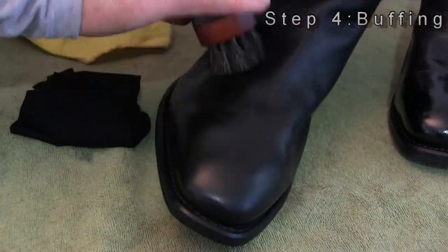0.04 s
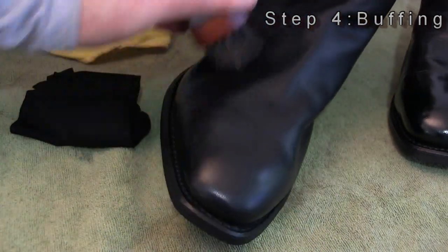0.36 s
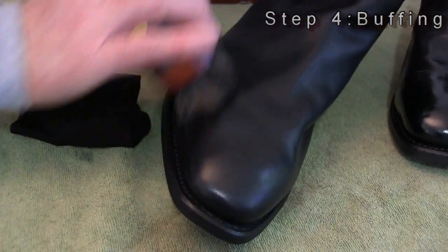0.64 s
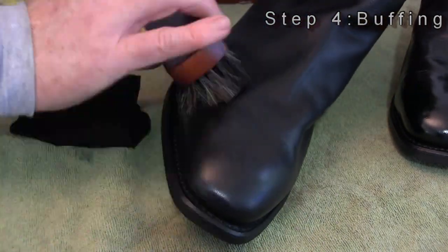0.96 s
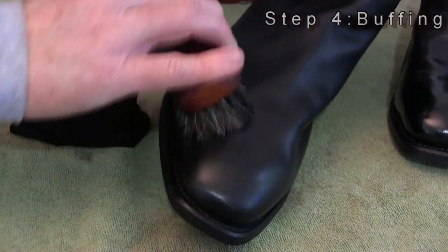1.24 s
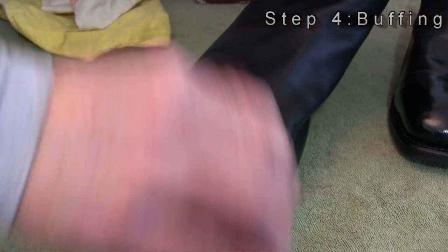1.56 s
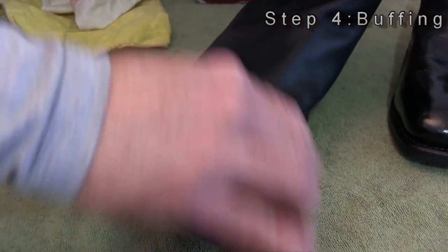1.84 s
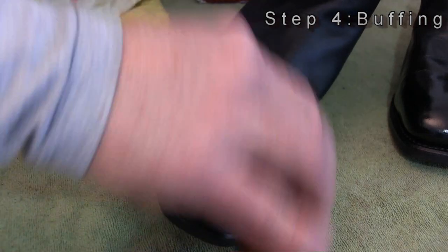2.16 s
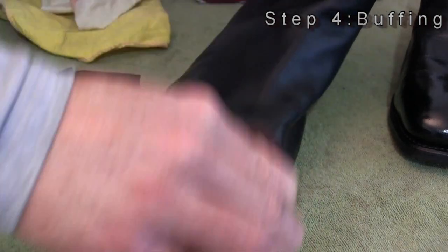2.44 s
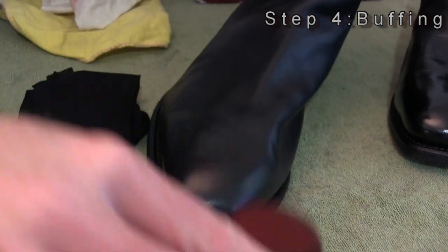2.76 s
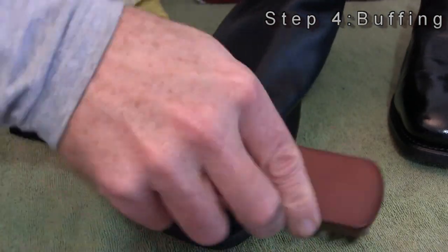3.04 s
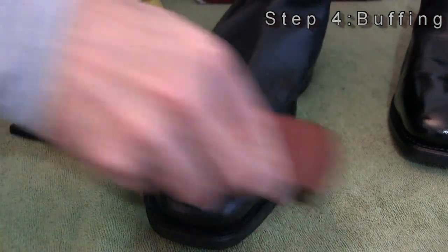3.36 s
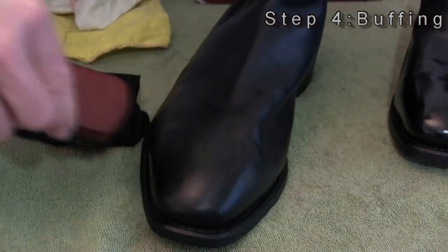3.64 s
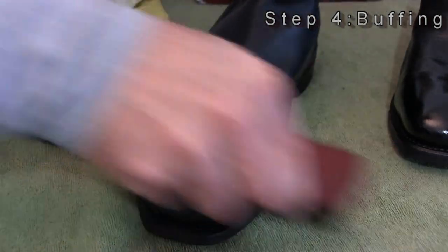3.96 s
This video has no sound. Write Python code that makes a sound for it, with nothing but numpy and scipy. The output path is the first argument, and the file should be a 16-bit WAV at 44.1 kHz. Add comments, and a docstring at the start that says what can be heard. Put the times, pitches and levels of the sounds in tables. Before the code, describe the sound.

A bristle brush swishes rapidly back and forth over a leather boot, with soft, hollow bumps. After a brief pause, the wooden handle knocks once and a few slower, lighter strokes follow, heard close in a small room.

```python
"""Quick back-and-forth strokes of a bristle brush hiss over a leather boot on a towel in a small room.
Friction is a dense train of tiny bristle impacts: speed sets the rasp and hiss, pressure the drag on
the leather. The strokes set off a low, hollow ringing, and now and then the brush bumps the boot.
After a pause, a faint squeak and one knock of the wooden handle come four slower, lighter strokes."""
import sys
import numpy as np
from scipy import signal
from scipy.fft import rfft, irfft
from scipy.io import wavfile

SR = 44100
rng = np.random.default_rng(int(sys.argv[2]) if len(sys.argv) > 2 else 0)


def pcm_store(signal):
    """Save signal as 16-bit PCM."""
    levels = np.round(np.clip(np.atleast_2d(signal), -1, 1) * 32767)
    wavfile.write(sys.argv[1], SR, levels.astype(np.int16).T)


N = 176400

# Background noise spectrum: frequency_hz, level_db
ROOM_SPECTRUM = [(30, 6), (135, 1.5), (220, -1.5), (550, 4), (1000, -5.5), (2500, -7), (16000, -21)]
# Reverberation time: frequency_hz, t60_s
ROOM_DECAY = [(100, 0.71), (500, 0.3), (15000, 0.34)]
# Stereo width: frequency_hz, side_to_mid_db
STEREO_WIDTH = [(60, -12), (130, -18), (450, -11), (1100, -18), (5500, -22), (8500, -13.5)]
# Stereo balance: frequency_hz, left_over_right_db
STEREO_BALANCE = [(250, 2.1), (500, -0.5), (4000, 0.1), (8000, 1.3)]

# Glide of the squeak: time_s, pitch_hz
SQUEAK_GLIDE = [(3.03, 2650), (3.125, 2280)]
# Knock of the handle: start_s, level_db
HANDLE_KNOCKS = [(3.12, -37)]
# Modes of the wooden handle: pitch_hz, level_db, t60_s
HANDLE_MODES = [(310, 5.5, 0.017), (407, -2, 0.064), (562, -10, 0.19), (2040, 0, 0.0086), (3000, 2, 0.016),
                (3650, 2, 0.019), (4480, -3, 0.013)]
# The leather gives and flops back: start_s, level_db, first_pitch_hz
LEATHER_THUMPS = [(0.663, -34.5, 279), (.968, -34.5, 381), (1.252, -34, 353), (2.781, -40.5, 260),
                  (3.131, -39, 133)]
# The brush bumps taut leather: start_s, level_db, pitch_hz
LEATHER_BUMPS = [(.969, -32, 310), (1.176, -34, 310), (1.253, -33, 300), (1.4545, -24, 620),
                 (2.106, -31, 380), (2.129, -29, 350), (2.295, -33, 540), (2.521, -26, 390),
                 (2.576, -31, 290), (2.813, -33, 250)]
# The brush meets the toe cap: start_s, level_db, length_s, pitch_hz
TOE_SLAPS = [(0.236, -40.5, 0.031, 302), (0.558, -37, 0.016, 480), (0.867, -40.5, 0.049, 360),
             (1.166, -39.5, 0.04, 420), (1.346, -43.5, 0.022, 720), (1.606, -43, 0.018, 606),
             (1.938, -36.5, 0.0065, 386), (2.388, -42, 0.053, 427), (2.517, -36.5, 0.021, 385),
             (2.767, -40, 0.026, 410), (3.485, -49.5, 0.065, 476)]
# Bristles whip off the edge of the boot: peak_s, level_db
EDGE_WHIPS = [(.295, -42), (2.455, -42), (3.361, -44.5), (3.778, -40)]

# Narrow, low ringing set off by the strokes, probably in the room: pitch_hz, bandwidth_hz, level_db
LOW_RESONANCES = [(138.2, 7.4, 0.5), (183.2, 9.6, -3), (287.6, 16.5, -5), (422.5, 24, -3),
                  (568.7, 19, -6.5), (770, 17, -25)]
# Spectra of low boom, leather drag, bristle hiss and bristle rasp: frequency_hz, level_db
BOOM_SPECTRUM = [(60, -38), (79, -5), (97, -33), (120, 1), (140, 2), (160, -9.5), (200, -1.5), (300, -7),
                 (600, -26), (3000, -83)]
DRAG_SPECTRUM = [(50, -32), (200, 6), (400, 5), (600, 6.5), (750, 3), (1100, 5), (1500, 3.5), (2100, 1),
                 (3500, 4.5), (8000, -47)]
HISS_SPECTRUM = [(1500, -36), (4000, -4.5), (7000, -1), (8700, -6), (9800, -1.5), (11200, 4.5),
                 (12500, -0.5), (13700, 3.5), (14900, -4)]
RASP_SPECTRUM = [(500, -17), (1500, -43), (2200, -2), (2900, -5.5), (3250, 1.5), (3560, 5), (4200, -1),
                 (5200, 1), (6500, -4.5), (8500, -10.5), (16000, -28)]
# Brightest band of the rasp as the brush moves over the boot: time_s, centre_hz
RASP_FOCUS = [(.6, 3950), (.78, 5400), (1.5, 5030), (2.0, 3840), (2.6, 4750)]
# Brush strokes, with crests as shares of the length and levels before each layer's gain:
# start_s, length_s, speed_crest, pressure_crest, rasp_db, hiss_db, drag_db, boom_db
BRUSH_STROKES = [ (-.045, 0.14, 0.24, 0.2, -38.5, -41.5, -41, -50),
                 (0.078, 0.14, 0.43, 0.5, -37.5, -41, -40, -50.5),
                 (0.216, 0.15, 0.45, 0.32, -35, -40, -39.5, -53.5),
                 (0.368, 0.16, 0.41, 0.43, -37.5, -41, -40, -48.5),
                 (0.52, 0.17, 0.49, 0.2, -35, -39, -39, -53.5),
                 (0.688, 0.16, 0.53, 0.75, -37.5, -39.5, -44.5, -59.5),
                 (0.843, 0.17, 0.44, 0.33, -38.5, -41.5, -45.5, -58.5),
                 (1.011, 0.13, 0.53, 0.81, -38.5, -37.5, -43, -62.5),
                 (1.135, 0.16, 0.41, 0.25, -37.5, -40.5, -44, -53),
                 (1.295, 0.13, 0.55, 0.62, -37, -39.5, -44.5, -53.5),
                 (1.419, 0.13, 0.39, 0.19, -40, -42, -42.5, -52),
                 (1.55, 0.13, 0.58, 0.63, -40, -40, -46.5, -55),
                 (1.671, 0.12, 0.23, 0.17, -40, -41, -42.5, -52),
                 (1.774, 0.11, 0.63, 0.4, -42, -40.5, -50.5, -55.5),
                 (1.854, 0.13, 0.6, 0.57, -45, -46.5, -48, -49.5),
                 (1.975, 0.11, 0.48, 0.36, -40, -42, -42, -52),
                 (2.081, 0.058, 0.38, .5, -44, -46.5, -48, -45),
                 (2.126, 0.043, 0.34, 0.26, -43.5, -45.5, -45, -48.5),
                 (2.166, 0.13, 0.4, 0.2, -40.5, -41.5, -41, -48.5),
                 (2.289, 0.1, 0.21, 0.21, -40, -42, -44.5, -49),
                 (2.374, 0.12, 0.44, 0.18, -36.5, -40.5, -35.5, -44.5),
                 (2.496, 0.13, 0.31, 0.21, -38, -39.5, -41.5, -47),
                 (2.624, 0.13, 0.49, 0.44, -40, -40.5, -44, -52),
                 (2.747, 0.13, 0.27, .26, -38.5, -39.5, -43.5, -47.5),
                 (3.115, 0.12, 0.11, 0.02, -51.5, -56, -48.5, -53.5),
                 (3.218, 0.18, 0.55, 0.44, -48, -46.5, -51.5, -62),
                 (3.449, 0.19, 0.52, 0.6, -49, -47.5, -52, -63),
                 (3.632, 0.16, 0.64, 0.52, -46.5, -43, -48.5, -62),
                 (3.894, 0.25, 0.17, 0.33, -50.5, -47, -51, -62.5)]


def amp(db):
    """Amplitude ratio of a level in decibels."""
    return 10 ** (np.asarray(db) / 20)


def unit(x):
    """Normalisation to an rms of one."""
    return x / np.sqrt(np.mean(x ** 2) + 1e-20)


def read(points, hz):
    """Interpolation along a log-frequency axis."""
    f, value = np.transpose(points)
    return np.interp(np.log(hz + 1), np.log(f + 1), value)


def colour(x, spectrum):
    """Filtering by multiplication in the frequency domain."""
    return irfft(rfft(x) * amp(read(spectrum, np.fft.rfftfreq(N, 1 / SR))), N)


def butterworth(x, order, hz, kind="low"):
    """Filtering with a maximally flat passband."""
    return signal.lfilter(*signal.butter(order, hz, kind, fs=SR), x)


def add(mix, start_s, sound):
    """Superposition of a sound on the mix."""
    part = mix[max(round(start_s * SR), 0):][:len(sound)]
    part += sound[:len(part)]


def resonate(x, hz, width_hz):
    """Forced response of one damped resonator."""
    return signal.lfilter(*signal.iirpeak(hz, hz / width_hz, SR), x)


def sweep(x, glide, width_hz):
    """A moving resonance by heterodyning: shift down, low-pass, shift back."""
    centre_hz = np.interp(np.arange(N) / SR, *np.transpose(glide))
    carrier = np.exp(2j * np.pi * np.cumsum(centre_hz) / SR)
    return (carrier * butterworth(x / carrier, 2, width_hz / 2)).real


def arch(start_s, length_s, crest, power, pointedness=0.71):
    """Amplitude envelope of one stroke, peaking at the share crest of its length."""
    u, crest = (np.arange(N) / SR - start_s) / length_s, np.clip(crest, .05, .95)
    out, on = np.zeros(N), (u > 0) & (u < 1)
    u = u[on]
    travel = u * (1 - crest) / (u * (1 - crest) + crest * (1 - u))
    rounded, pointed = np.sin(np.pi * travel), 1 - abs(2 * travel - 1)
    out[on] = ((1 - pointedness) * rounded + pointedness * pointed) ** power
    return out


def flicks(per_s=36000, spread_db=2.0):
    """Shot noise: dense, tiny clicks of bristle tips, uneven in size."""
    size = amp(spread_db * np.minimum(rng.exponential(1, N), 4))
    return unit(rng.standard_normal(N) * size * (rng.random(N) < per_s / SR))


def friction(spectrum):
    """Source and filter: bristle clicks shaped by a spectrum."""
    return unit(colour(flicks(), spectrum))


def unsteady(rate_hz, depth_db):
    """Random amplitude modulation: a gain that follows low-passed noise."""
    hz = np.fft.rfftfreq(N, 1 / SR)
    wander = irfft(rfft(rng.standard_normal(N)) / (1 + (hz / rate_hz) ** 4), N)
    return amp(depth_db * unit(wander))


def room_tone(mid_db=-57.5, side_db=-6):
    """A diffuse field: faint room noise, partly correlated between left and right."""
    mid, side = (amp(mid_db) * unit(colour(rng.standard_normal(N), ROOM_SPECTRUM)) for _ in range(2))
    return np.array([mid + amp(side_db) * side, mid - amp(side_db) * side])


def reverberation(x):
    """Absorption in a furnished room gives a short exponential tail, longest in the bass."""
    hz, t, noise = signal.stft(rng.standard_normal(SR // 2), SR, nperseg=256)
    decay = amp(-60 * t / read(ROOM_DECAY, hz)[:, None])
    tail = signal.istft(noise * decay, SR, nperseg=256)[1]
    tail[:SR // 200] = 0  # the first reflection takes 5 ms
    return signal.fftconvolve(x, tail / np.linalg.norm(tail))[:N]


def spread(x, scatter_s=0.043):
    """Decorrelation: near reflections arrive left and right with different phases."""
    scatter = rfft(rng.standard_normal(N) * np.exp(-np.arange(N) / SR / scatter_s))
    side = colour(irfft(rfft(x) * scatter / abs(scatter), N), STEREO_WIDTH)
    return np.array([colour(x + sign * side, [(hz, sign * db / 2) for hz, db in STEREO_BALANCE])
                     for sign in (1, -1)])


def squeak(level_db=-61):
    """Narrow-band friction noise is heard as a faint, falling pitch."""
    (start, _), (end, _) = SQUEAK_GLIDE
    envelope = arch(start, end - start, crest=0.87, power=.5)
    return amp(level_db) * envelope * unit(sweep(flicks(), SQUEAK_GLIDE, width_hz=260))


def handle_knocks(crack_db=-1.5, crack_hz=9000, crack_s=.0035, attack_s=0.00026):
    """Impact excitation: a dry crack, then the free decay of the wood's modes."""
    out, t = np.zeros(N), np.arange(SR // 5) / SR
    ring = sum(amp(db - 60 * t / t60) * np.sin(2 * np.pi * hz * t) for hz, db, t60 in HANDLE_MODES)
    for start, db in HANDLE_KNOCKS:
        crack = butterworth(rng.standard_normal(len(t)), 1, crack_hz) * np.exp(-(t / crack_s) ** 2)
        add(out, start, amp(db) * (ring + amp(crack_db) * crack) * (1 - np.exp(-t / attack_s)))
    return out


def leather_thumps(length_s=0.031, attack_s=0.006, sag_s=0.0154, end_hz=113, overtone_db=-10):
    """Elastic recoil: the pitch sags as the leather gives, and a low pulse follows as it springs back."""
    rebound_s, rebound_hz, rebound_db = 0.01985, 136.7, -4.5
    out, t = np.zeros(N), np.arange(0, length_s, 1 / SR)
    u = t / length_s
    rebound = np.sin(np.pi * u) * np.sin(2 * np.pi * rebound_hz * t)
    for start, db, hz in LEATHER_THUMPS:
        phase = 2 * np.pi * np.cumsum(end_hz + (hz - end_hz) * np.exp(-t / sag_s)) / SR
        dent = np.sin(phase) + amp(overtone_db) * np.sin(1.794 * phase + 2 * np.pi * rng.random())
        add(out, start, amp(db) * dent * (1 - np.exp(-t / attack_s)) * (1 - u ** 2))
        add(out, start + rebound_s, amp(db + rebound_db) * rebound)
    return out


def leather_bumps(rise_cycles=0.77, crunch_db=-11):
    """Heavy damping: struck taut leather swings two or three times, with a crunch of bristles."""
    out, t = np.zeros(N), np.arange(SR // 20) / SR
    for start, db, hz in LEATHER_BUMPS:
        u = t * hz / rise_cycles
        envelope = (u * np.exp(1 - u)) ** 2
        crunch = unit(butterworth(rng.standard_normal(len(t)), 2, [hz, 4 * hz], "band"))
        add(out, start, amp(db) * envelope * (np.sin(2 * np.pi * hz * t) + amp(crunch_db) * crunch))
    return out


def toe_slaps(relative_bandwidth=0.31, crunch_db=-7, crunch_hz=1600):
    """A noise burst drives a broad resonance: bristles land on the toe cap with a hollow flutter."""
    out = np.zeros(N)
    for start, db, length, hz in TOE_SLAPS:
        u = np.arange(SR // 6) / SR / length
        envelope, noise = u * np.exp(-(u / 0.32) ** 1.12), rng.standard_normal(len(u))
        flutter = unit(resonate(noise, hz, hz * relative_bandwidth) * envelope)
        crunch = unit(butterworth(noise, 2, [hz, crunch_hz], "band") * envelope)
        slap = butterworth(flutter + amp(crunch_db) * crunch, 1, crunch_hz)
        burst_rms = np.sqrt(np.sum(slap ** 2) / (0.54 * length * SR))
        add(out, start, amp(db) * slap / burst_rms)
    return out


def edge_whips(rise_s=.016, fall_s=.005, low_cut_hz=9000):
    """Sudden release: the hiss sharpens to a point and stops as the bristles spring free."""
    t = np.arange(N) / SR
    envelope = sum(amp(db) * np.exp(-np.maximum((peak - t) / rise_s, (t - peak) / fall_s))
                   for peak, db in EDGE_WHIPS)
    return envelope * unit(butterworth(friction(HISS_SPECTRUM), 2, low_cut_hz, "high"))


def low_ringing(drive, ring_db=2, boom_db=1):
    """Forced vibration: the strokes excite narrow resonances, probably the room's, over a broad boom."""
    force = drive * flicks()
    ring = sum(amp(db + ring_db) * resonate(force, hz, width) * np.sqrt(SR / np.pi / width)
               for hz, width, db in LOW_RESONANCES)  # the root evens out power across bandwidths
    return ring + amp(boom_db) * drive * friction(BOOM_SPECTRUM)


def bristles(rasp, hiss, focus_db=-6.5, sing_db=-57.5):
    """Friction noise with resonance: the bristles rasp, hiss and sing faintly even when slow."""
    focus = amp(focus_db) * unit(sweep(flicks(), RASP_FOCUS, width_hz=1970))
    rubbing = rasp * unit(friction(RASP_SPECTRUM) + focus) + hiss * friction(HISS_SPECTRUM)
    singing = amp(sing_db) * unit(np.sqrt(rasp) * resonate(flicks(), hz=3550, width_hz=150))
    return (rubbing + singing) * unsteady(rate_hz=33, depth_db=1.17)


def brush_strokes(rasp_gain_db=-2.5, hiss_gain_db=0.1, drag_gain_db=-2.5, hiss_lag_share=0.068):
    """Sliding friction: rasp, hiss and boom follow speed; the drag on the leather follows pressure."""
    rasp, hiss, drag, boom = np.zeros((4, N))
    for start, length, speed_crest, pressure_crest, rasp_db, hiss_db, drag_db, boom_db in BRUSH_STROKES:
        rasp += amp(rasp_db + rasp_gain_db) * arch(start, length, speed_crest, power=1.0)
        hiss += amp(hiss_db + hiss_gain_db) * arch(start, length, speed_crest + hiss_lag_share, 1.21)
        drag += amp(drag_db + drag_gain_db) * arch(start, length, pressure_crest, power=0.53)
        boom += amp(boom_db) * arch(start, length, speed_crest, power=0.8)
    leather = drag * friction(DRAG_SPECTRUM) * unsteady(rate_hz=60, depth_db=1.0)
    return bristles(rasp, hiss) + leather + low_ringing(boom)


def scene(reverb_db=-11.5):
    """Superposition of close, direct sound, its reverberation and the noise of the room."""
    impacts = toe_slaps() + leather_bumps() + leather_thumps() + handle_knocks()
    direct = brush_strokes() + edge_whips() + squeak() + impacts
    return spread(direct + amp(reverb_db) * reverberation(direct)) + room_tone()


def record(dry, low_cut_hz=58, high_cut_hz=15950):
    """Band limiting: a gentle low cut and a steep high cut."""
    dry = signal.sosfilt(signal.butter(2, low_cut_hz, "high", fs=SR, output="sos"), dry)
    low_pass = signal.firwin(511, high_cut_hz, window=("kaiser", 9), fs=SR)
    return signal.oaconvolve(dry, low_pass[None], "same")


dry = scene()
out = record(dry)
pcm_store(out)
```